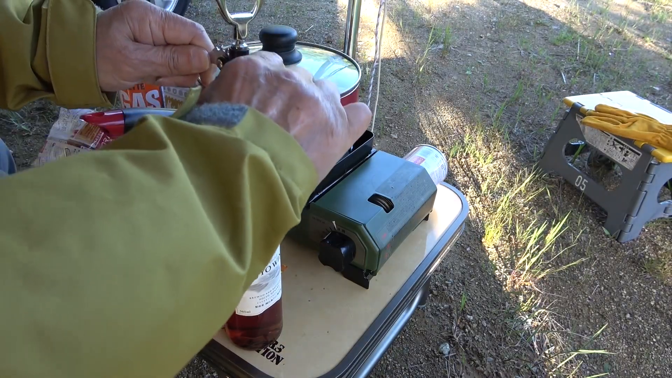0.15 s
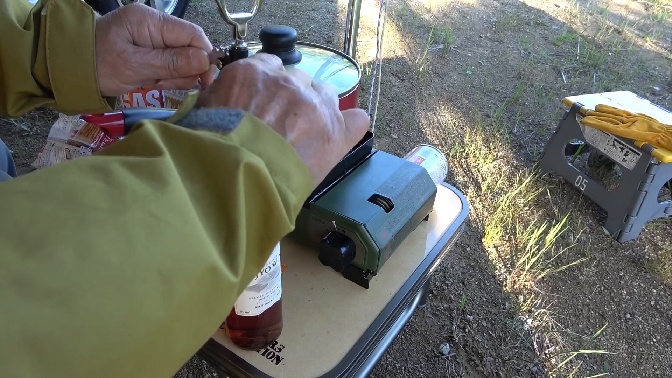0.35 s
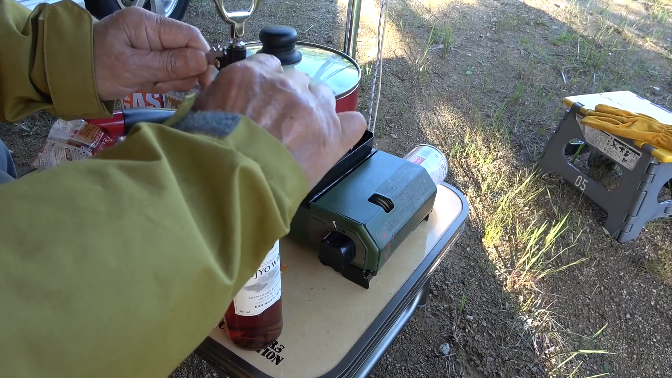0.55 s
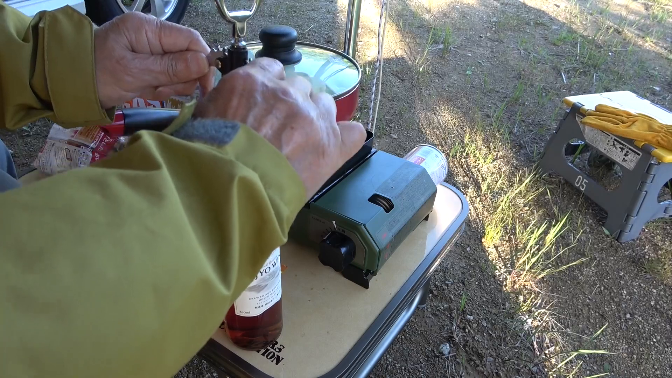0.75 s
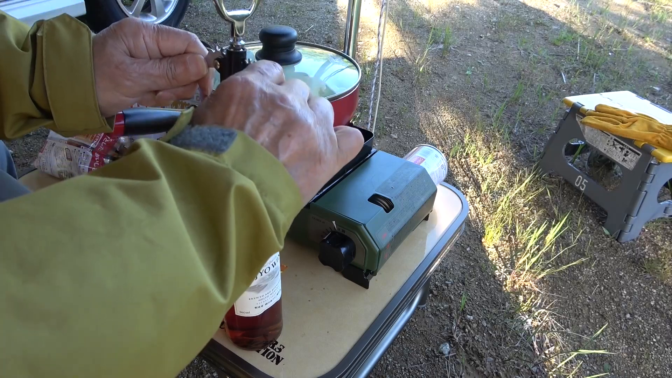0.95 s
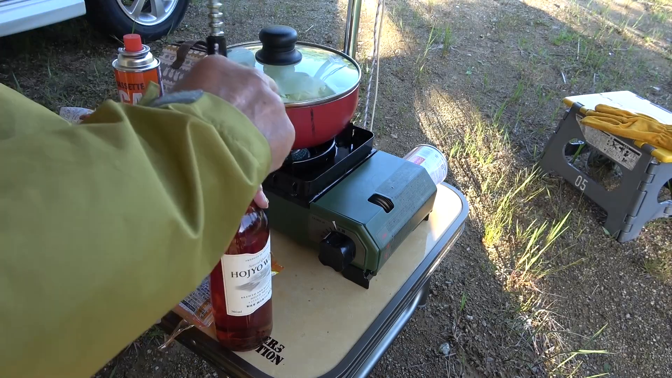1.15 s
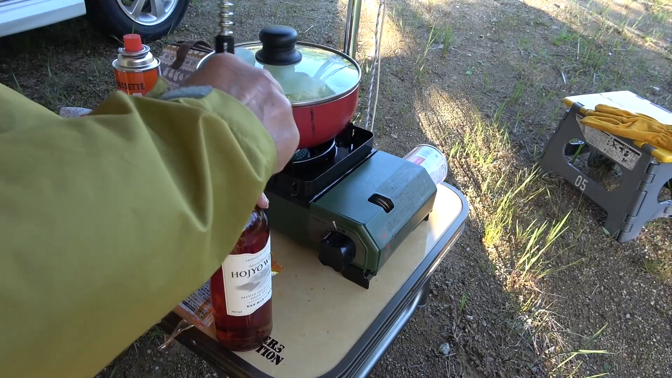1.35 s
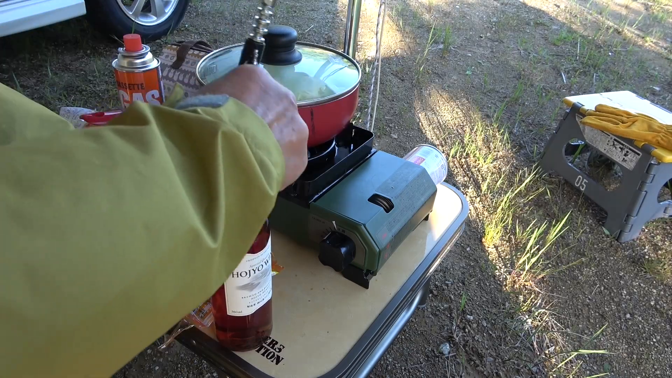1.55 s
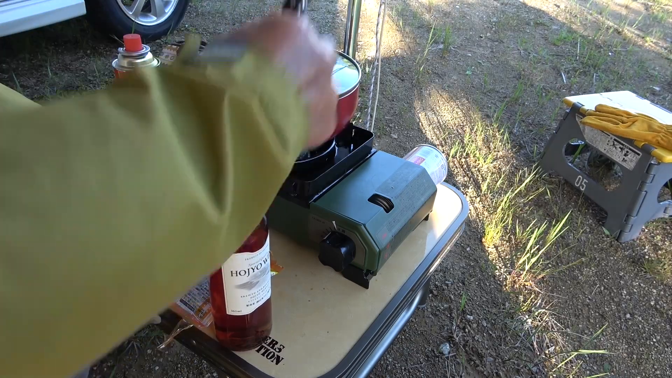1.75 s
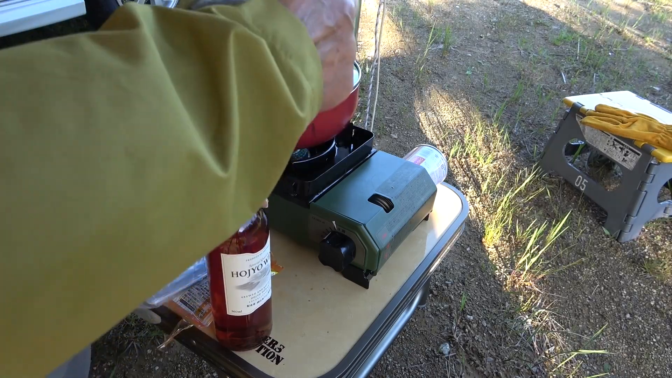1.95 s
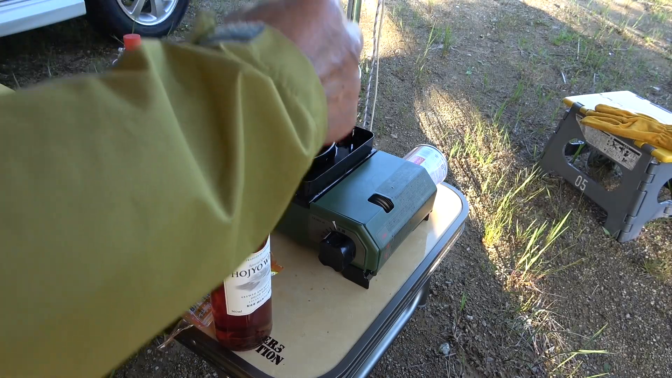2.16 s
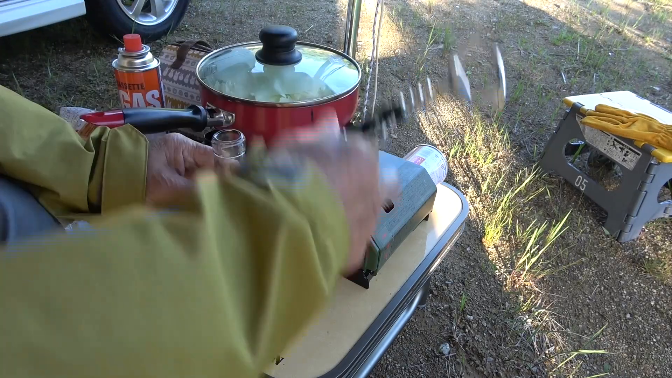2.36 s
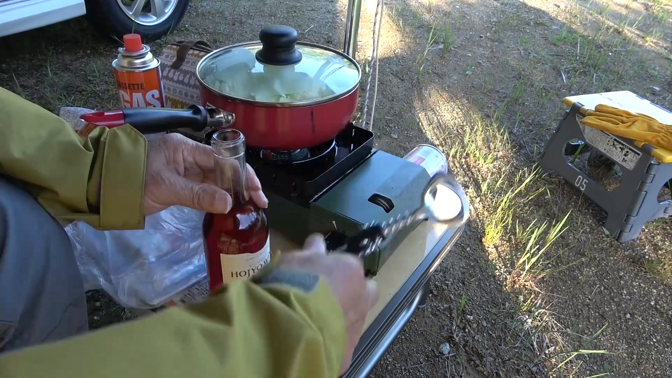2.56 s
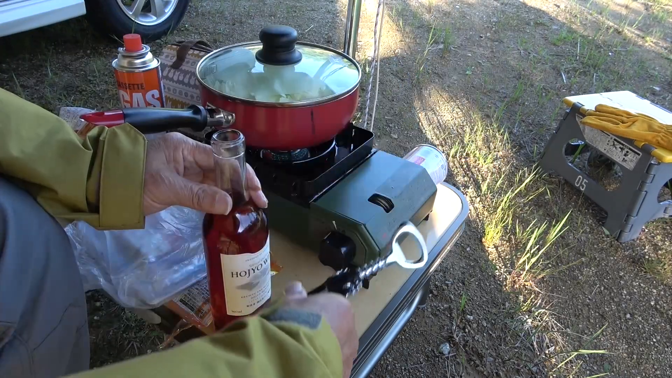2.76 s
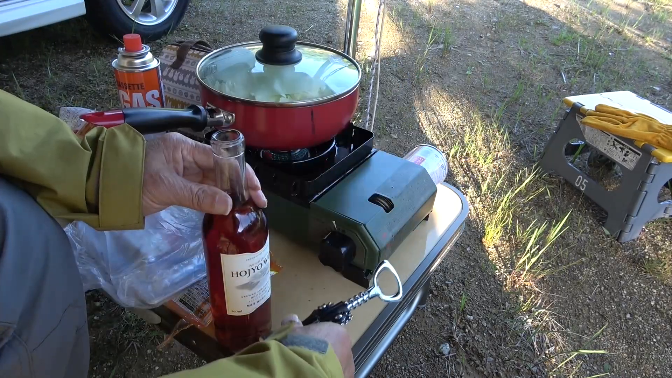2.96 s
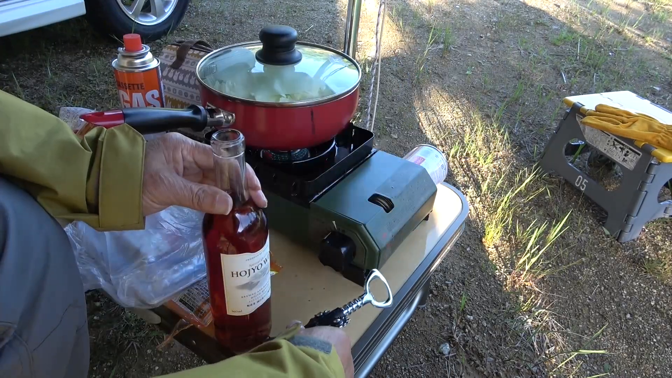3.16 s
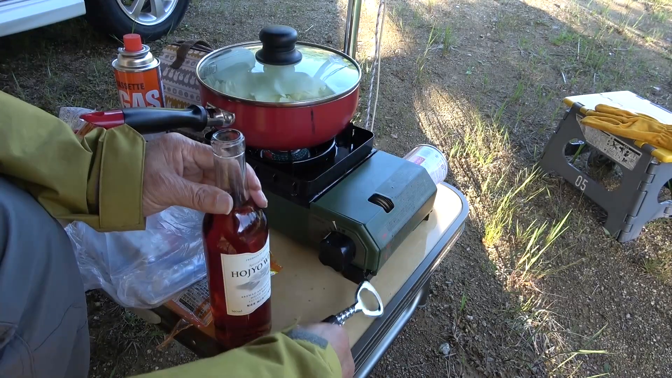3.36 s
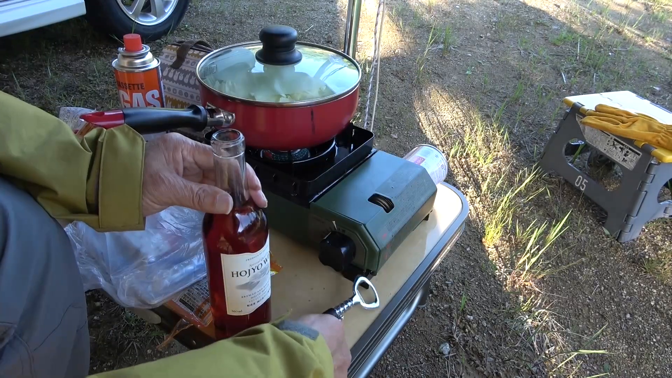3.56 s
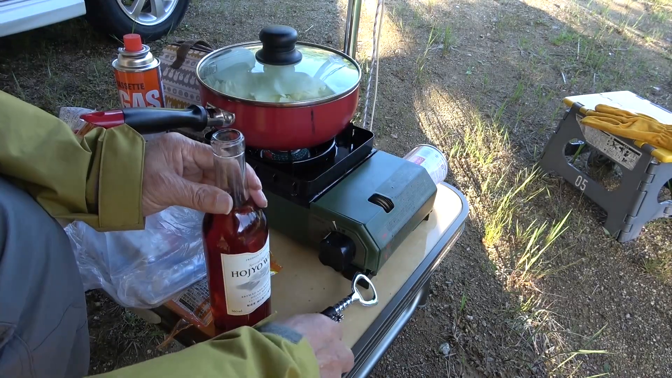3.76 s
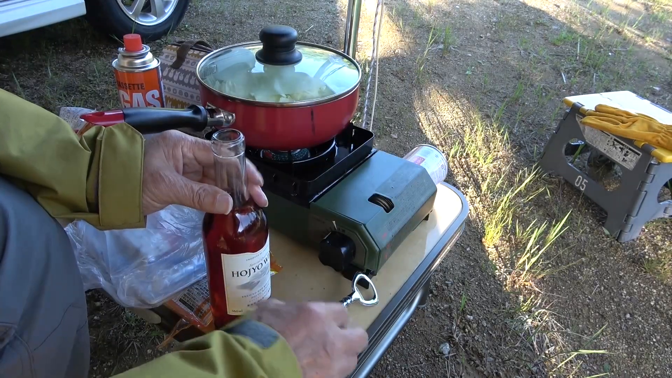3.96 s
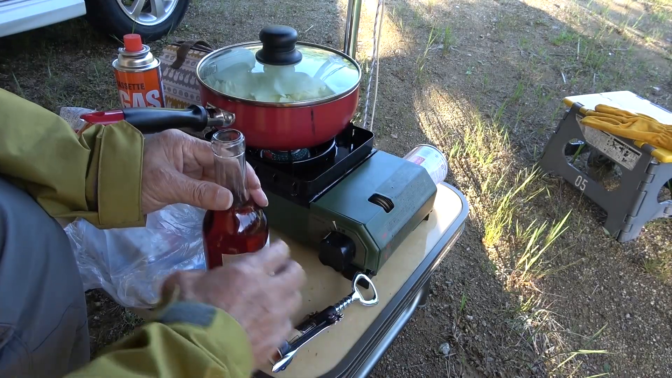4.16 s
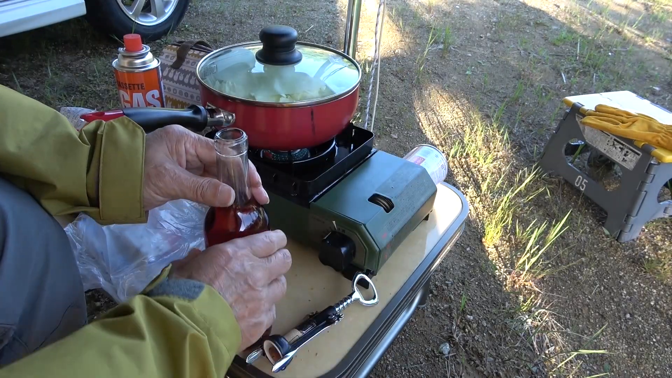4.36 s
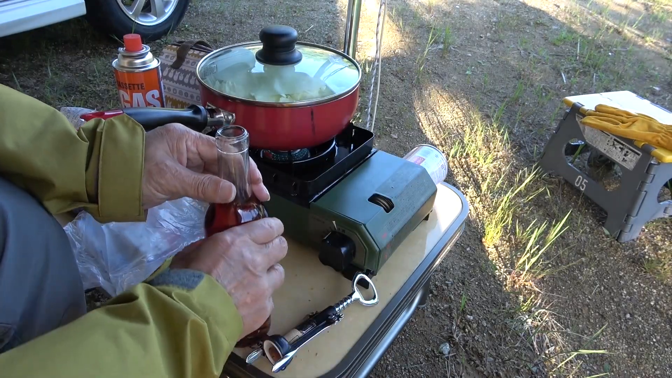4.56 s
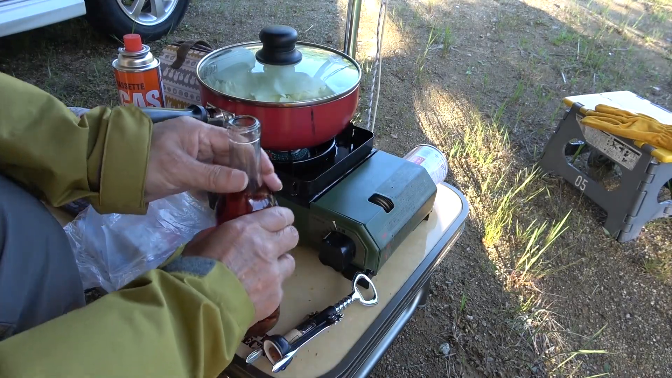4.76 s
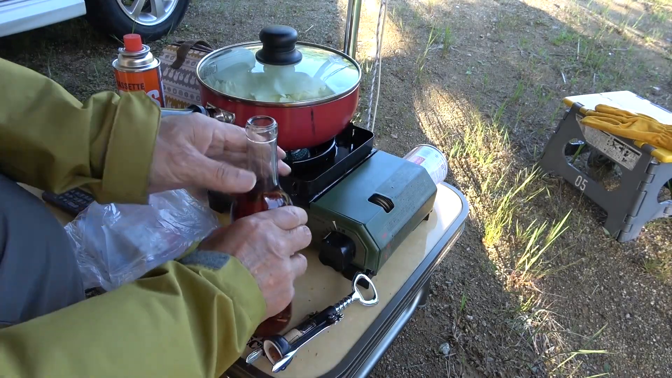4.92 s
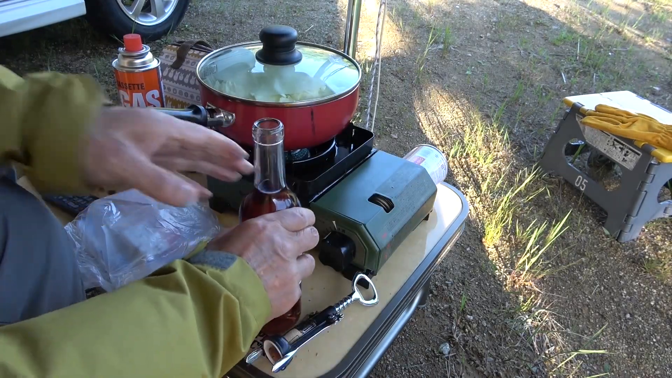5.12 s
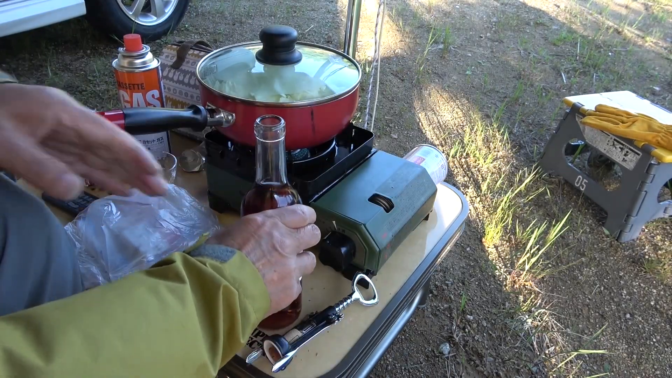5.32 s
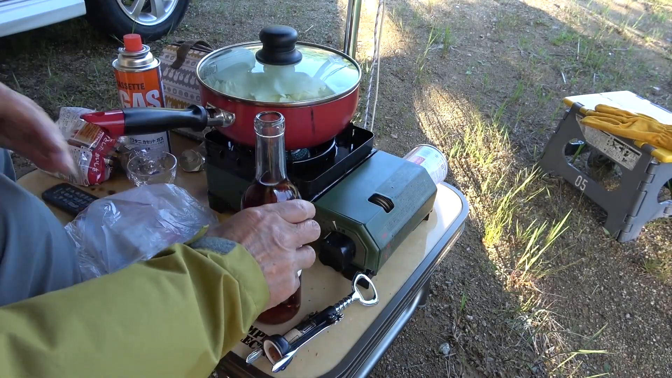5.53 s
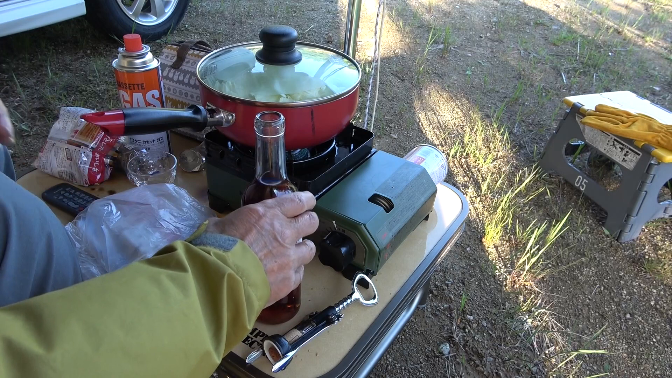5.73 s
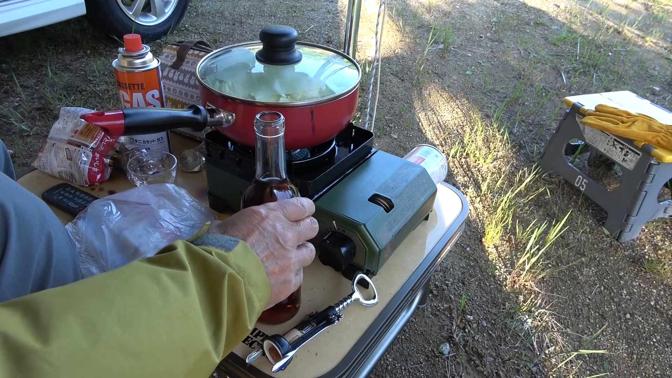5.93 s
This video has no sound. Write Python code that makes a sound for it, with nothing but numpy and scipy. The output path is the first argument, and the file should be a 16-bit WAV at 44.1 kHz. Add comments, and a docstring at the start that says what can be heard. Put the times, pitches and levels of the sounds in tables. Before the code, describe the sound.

A soft, hollow cork pop, faint birdlike chirps, loud metallic clacks on a thin tabletop, a heavy bottle knock and swishing jacket sleeves in quiet open air.

```python
"""Opening a bottle at a camp table

Outdoors, a cork squeaks out of a wine bottle and pops softly: noise slips, snaps and a ringing bottle neck.
A metal corkscrew slides and clacks on the table, and the bottle is set down: decaying tones plus noise bursts.
Sleeves swish in grainy noise. Behind lie a low rush and insects of filtered noise, and gliding sine chirps."""
import sys
import numpy as np
from scipy import signal
from scipy.fft import rfft, irfft
from scipy.io import wavfile
from scipy.ndimage import uniform_filter1d

SR = 44100
rng = np.random.default_rng(int(sys.argv[2]) if len(sys.argv) > 2 else 0)


def to_wav(s):
    """Save 16-bit WAV."""
    ch = np.atleast_2d(s).T  # columns
    pcm = np.round(np.clip(ch, -1, 1) * 32767)  # PCM
    wavfile.write(sys.argv[1], SR, pcm.astype(np.int16))


N = 268524
TIME = np.arange(N) / SR
AGE = TIME[:SR // 2]  # seconds since a hit began, up to half a second

# Tables named ..._COLOUR, and RATTLE, BOOM, BOTTLE_KNOCK and AIR, only shape the tone of noise.
# Levels in decibels are relative; fade times t60_s are the time to drop by 60 dB.

# knocks on the table top; hardness is where the treble starts to fall:
# start_s, level_db, contact_pitch_hz, hardness_hz, thump_db
BLOWS = [ (3.2604, -42.5, 1130, 4000, -11), (3.314, -29, 1045, 5500, -14), (3.4090, -9, 1142, 3400, -9),
         (3.413, -10.5, 2400, 11000, -1), (3.5488, -28, 2230, 10000, 2.5), (3.6041, -15, 2026, 4400, -0.5),
         (3.6541, -17, 1132, 2100, -0.5), (3.684, -42, 1120, 1500, 22), (3.7674, -41.5, 1160, 3000, 3),
         (3.894, -42, 1070, 3000, -2), (4.079, -54.5, 500, 1500, 18), (5.4722, -44, 1310, 4000, 7), ]
# tones of the thin table top: pitch_hz, level_db, t60_s
TABLE_MODES = [(1061, 6.5, 0.13), (1550, -18, 0.086), (1623, 0, 0.11), (1857, 5.5, 0.1), (2200, 4, 0.11),
               (2420, -3, 0.13), (2420, -5, 0.14), (2800, -3, 0.068), (2897, 1, 0.12), (3096, 2, 0.084),
               (3410, -11, 0.18), (3480, -22, 0.16), (3670, -18, 0.071), (4235, 4.5, 0.066),
               (4220, -25, 0.13), (4260, -4, 0.12), (4860, -29, 0.07), (5430, -2, 0.034), (6150, -10, 0.11),
               (7200, -17, 0.054), (7060, -14, 0.092), (7100, -26, 0.11), (7160, -25, 0.14),
               (8600, -10, 0.076), (8400, -6, 0.08), (8900, -18, 0.09)]
# slower-swelling tones of the whole table flexing on its legs: pitch_hz, level_db, t60_s
TABLE_FLEX = [(128, -12, 0.23), (191, 0.5, 0.13), (227, -4, 0.19), (264.4, 0, 0.18), (339, -11, 0.095),
              (434, -21, 0.078)]
# dense rattle of the frame and things on the table: frequency_hz, level_db
RATTLE = [(60, -38), (200, -11), (480, -10.5), (700, -19), (1050, 6.5), (1500, -1.5), (2300, 1.5),
          (3100, 0.5), (5000, -7.5), (7000, -6.5), (8300, -9), (10000, -11.5), (15000, -18)]
# boom of the hollow underside: frequency_hz, level_db
BOOM = [(50, -47), (110, -19), (170, -7), (235, 6), (320, -8), (450, -3.5), (620, -6), (1200, -41)]
# the bottle lands, then rocks flat: start_s, level_db, contact_pitch_hz
LANDINGS = [(5.011, 1, 1946), (5.1668, -15.5, 1250)]
# the heavy bottle drives the table: pitch_hz, level_db, t60_s
BOTTLE_MODES = [(150, -32.5, 0.17), (216.4, -21, 0.22), (241, -20.5, 0.24), (402, -15.5, 0.042),
                (437, -18.5, 0.11), (758, -24, 0.077), (1026, -14, 0.019)]
# dull knock of the full bottle: frequency_hz, level_db
BOTTLE_KNOCK = [(120, -22), (300, -7), (420, 6), (600, -8.5), (760, -7), (1100, -8.5), (1450, -23),
                (1950, -12), (2600, -29), (5000, -48)]
# shoves of the corkscrew over the table: peak_s, level_db, swell_s, fade_s
SLIDE = [(3.41, -44, 0.021, .06), (3.535, -36, 0.035, 0.053), (3.74, -52, .04, .04),
         (3.9, -50.5, 0.028, 0.018)]
# rubs of the cork on the glass: peak_s, level_db, swell_s, fade_s
CORK_SLIP = [(1.693, -36, 0.0081, .004), (1.72, -48.5, 0.022, 0.068), (1.885, -57.5, 0.044, .04)]
# tone of the rubbing cork: frequency_hz, level_db
CORK_COLOUR = [(710, -49), (1200, -13), (1530, -10), (2060, 0.5), (2710, -2), (3040, -10), (3840, -4),
               (4360, -9.5), (5320, -5), (6310, -5.5), (7870, -9.5), (8750, -7), (15000, -24)]
# the cork lets go in a few jerks: start_s, neck_db, snap_db
POPS = [(1.6954, -32.5, -43), (1.7134, -24.5, -25.5), (1.7337, -41, -33.5), (1.745, -33, -50)]
# tone of each snap: frequency_hz, level_db
SNAP_COLOUR = [(350, -27), (600, 2), (754, -9), (988, 2), (1240, -12), (1380, -7), (2790, -5.5),
               (3550, -19), (6250, -23), (15000, -35)]
# air in and around the bottle neck: pitch_hz, level_db, t60_s
NECK_MODES = [(108.7, -14.5, 0.32), (160, -15, 0.09), (214, 4, 0.068), (255, -4.5, 0.2), (401, -7, 0.11),
              (506.6, -10, 0.22), (977, -12, 0.071)]
# faint singing of the bottle glass: pitch_hz, level_db, t60_s
GLASS = [(1550, -52, 1.0)]
# light, dry clicks of corkscrew and fingers: start_s, level_db, lowest_hz, highest_hz, t60_s
CLICKS = [(0.766, -33.5, 350, 2800, 0.011), (4.788, -25.5, 1870, 5000, 0.027),
          (5.596, -39, 2200, 5900, .025)]
# left and right tone of the things on the table: frequency_hz, left_minus_right_db
NEAR_BALANCE = [(60, -5), (110, 2.5), (200, 3.5), (380, 4), (700, 3), (1290, 2), (2380, 1), (4400, 4),
                (8120, 4.5), (15000, -1)]
# strokes of sleeve and hand: peak_s, level_db, swell_s, fade_s
SLEEVE = [(1.205, -60, .015, .012), (2.6, -55, 0.2, .65), (4.3, -56.5, 0.49, .5), (4.78, -45, 0.044, 0.19),
          (5.1, -46.5, 0.11, 0.13), (5.335, -43, 0.09, .1), (5.6, -56, .1, .08), (6.05, -55.5, .25, .3)]
# tone of the cloth: frequency_hz, level_db
SLEEVE_COLOUR = [(300, -32), (800, 1), (1700, -2), (2600, -4), (3500, -4.5), (5000, -5.5), (6200, -5),
                 (8000, -9), (11000, -14.5), (15000, -20)]
# left and right tone of the cloth: frequency_hz, left_minus_right_db
SLEEVE_BALANCE = [(60, 1.0), (110, 2.5), (200, -1), (380, 2.5), (700, 2.5), (1290, 7.5), (2380, 6),
                  (4400, 8.5), (8120, 7), (15000, -0.5)]
# faint chirps: start_s, length_s, start_hz, middle_hz, end_hz, level_db
CHIRPS = [(2.032, .05, 1820, 1780, 1560, -55.5), (2.15, .075, 2800, 2300, 1980, -57),
          (2.261, .09, 1784, 2000, 2410, -52), (2.447, 0.068, 2330, 2015, 1850, -53),
          (4.35, .14, 6000, 5850, 5800, -62)]
# insects: pitch_hz, width_hz, level_db, start_s, stop_s
INSECTS = [(8280, 220, -71, -1, 7), (9700, 220, -75, -1, 1.2), (2850, 68, -72.5, -1, 1.06),
           (11660, 370, -73.5, 1.27, 4.37), (12660, 250, -76, .9, 4.7)]
# tone of the outdoor rush: frequency_hz, level_db
AIR = [(15, -38), (25, -8), (99, -7.5), (140, -2.5), (215, -5.5), (349, -0.5), (378, -5), (469, -4),
       (684, -14), (1750, -23.5), (1900, -27), (2850, -23.5), (3720, -30), (8350, -31), (15500, -39.5)]
# how wide the rush is, before a shared cut of the side part: frequency_hz, side_minus_mid_db
AIR_SIDE = [(60, -8), (110, -14), (200, -19), (380, -11.5), (700, -3), (1290, -16), (2380, -16), (4400, -6),
            (8120, 7.5), (15000, -11)]
# left and right tone of the middle of the rush: frequency_hz, left_minus_right_db
AIR_BALANCE = [(60, 1.5), (110, 0), (200, 7), (380, 2.5), (700, 1.5), (1290, 3.5), (2380, 1), (4400, 3.5),
               (8120, 0.5), (15000, -0.5)]

# every knock shares the rattle's fade and the gain of its crack
RATTLE_T60_S, CRACK_DB = 0.11, 3
# a soft contact gives a pitched clack; each octave of hardness takes some of it away
CLACK_DB, CLACK_AT_HZ, CLACK_DB_PER_OCTAVE = 16, 2500, -4
# how the bottle's base strikes the table top
BASE_DB, BASE_CLACK_DB, BASE_THUMP_DB, BASE_HARD_HZ = -20, 13, 4, 1200
NECK_LAG_S = 0.00199  # the air in the neck answers just after each snap
# the ribbed weave sings around this pitch
SWISH_HZ, SWISH_WIDTH_HZ = 2500, 870
SWISH_FULL_DB, SWISH_SLOPE = -42.5, 1.74
AIR_DB = -47
# a deep rumble holds, then dies away
RUMBLE_DB, RUMBLE_END_S, RUMBLE_T60_S = -59.5, 1.1, 0.6
TOP_HZ = 15700  # the microphone passes nothing much above this


def undb(db):
    """Turn decibels into a gain."""
    return 10 ** (np.asarray(db) / 20)


def unit(x):
    """Scale a sound to an average strength (rms) of 1."""
    return x / np.sqrt(np.mean(x ** 2))


def freqs(x):
    """Frequency of each spectral bin of x, in Hz."""
    return np.maximum(np.fft.rfftfreq(len(x), 1 / SR), 1)


def colour(x, points, power=1):
    """Shape the tone of x with a table of frequency_hz and level_db."""
    hz, db = np.transpose(points)
    level_db = np.interp(np.log(freqs(x)), np.log(hz), db)
    return irfft(rfft(x) * undb(power * level_db), len(x))


def band(hz, width_hz):
    """Noise in a narrow band around one pitch, rms 1."""
    noise = rng.standard_normal(N)
    distance = 2 * (freqs(noise) - hz) / width_hz
    return unit(irfft(rfft(noise) / (1 + distance ** 4), N))


def walk(rate):
    """Smooth random wander with about `rate` new values a second."""
    hold = int(SR / rate)
    steps = np.repeat(rng.standard_normal(N // hold + 1), hold)
    return 1.04 * uniform_filter1d(steps, hold)[:N]


def grains(rate, spread_db):
    """Tiny slips of uneven size at random moments, `rate` a second on average."""
    happens = rng.random(N) < rate / SR
    size = rng.standard_normal(N)
    return happens * size * undb(spread_db * rng.standard_normal(N))


def fade(t60, rise):
    """Gain of one hit: it swells at a pace set by `rise` seconds and dies away."""
    return (1 - np.exp(-AGE / rise)) * np.exp(-np.log(1000) * AGE / t60)


def ring(modes, rise, scatter_db=0, scatter_phase=0, detune=0):
    """Sum of fading tones; size, phase and pitch can vary at random from blow to blow."""
    chance = rng.standard_normal((len(modes), 3))
    out = np.zeros(len(AGE))
    for (hz, db, t60), (size, phase, pitch) in zip(modes, chance):
        angle = 2 * np.pi * hz * (1 + detune * pitch) * AGE + scatter_phase * phase
        out += undb(db + scatter_db * size) * fade(t60, rise) * np.sin(angle)
    return out


def burst(points):
    """Noise of the given tone, as long as one hit, rms 1."""
    return unit(colour(rng.standard_normal(len(AGE)), points))


def swells(rows):
    """Gain of rubbing strokes: each gathers, peaks and slows in a bell shape; their powers add."""
    power = np.zeros(N)
    for peak_s, db, swell_s, fade_s in rows:
        width_s = np.where(TIME < peak_s, swell_s, fade_s)
        power += undb(db) ** 2 * np.exp(-((TIME - peak_s) / width_s) ** 2)
    return np.sqrt(power)


def add(track, s, sound):
    """Mix a sound into the track at s seconds."""
    i = int(s * SR)
    track[i:i + len(sound)] += sound[:N - i]


def place(x, balance):
    """Make left and right channels, each taking half of the balance in dB."""
    return np.array([colour(x, balance, .5), colour(x, balance, -.5)])


def table():
    """The corkscrew, the hands and one light touch of the bottle knock; softer contacts clack more."""
    out = np.zeros(N)
    for s, db, hz, hard_hz, thump_db in BLOWS:
        clack_db = CLACK_DB + CLACK_DB_PER_OCTAVE * np.log2(hard_hz / CLACK_AT_HZ)
        add(out, s, undb(db) * knock(hz, hard_hz, clack_db, thump_db))
    return out


def knock(hz, hard_hz, clack_db, thump_db):
    """A blow cracks and clacks at the contact; the top rings, the frame rattles, the table flexes."""
    clack = fade(t60=.016, rise=0.0012) * np.sin(2 * np.pi * hz * AGE)
    top = undb(-15) * ring(TABLE_MODES, rise=0.0015, scatter_db=2.5, scatter_phase=np.pi, detune=0.0018)
    rattle = undb(-4) * burst(RATTLE) * fade(RATTLE_T60_S, rise=0.0016)
    crack = undb(CRACK_DB) * burst(RATTLE) * fade(t60=.013, rise=.0002)
    # a softer contact pushes longer and leaves the treble out
    soft = signal.butter(1, min(hard_hz, SR / 2 - 1), fs=SR)
    bright = signal.lfilter(*soft, top + rattle + crack)
    # a broad contact patch blurs the very top as well
    blur = signal.butter(1, min(6 * hard_hz, SR / 2 - 1), fs=SR)
    bright = signal.lfilter(*blur, bright)
    flex = undb(-10.5) * ring(TABLE_FLEX, rise=0.013, scatter_db=3, scatter_phase=0.59)
    boom = undb(-13) * burst(BOOM) * fade(t60=0.2, rise=0.0089)
    return undb(clack_db) * clack + bright + undb(thump_db) * (flex + boom)


def bottle():
    """The full bottle strikes the table top; its weight adds a dull thud and a low ring."""
    out = np.zeros(N)
    for s, db, hz in LANDINGS:
        base = undb(BASE_DB) * knock(hz, BASE_HARD_HZ, BASE_CLACK_DB, BASE_THUMP_DB)
        thud = undb(-14.5) * burst(BOTTLE_KNOCK) * fade(t60=0.08, rise=0.0066)
        low_ring = ring(BOTTLE_MODES, rise=0.0025)
        add(out, s, undb(db) * (base + thud + low_ring))
    return out


def cork():
    """The cork squeaks in fast slips and snaps free; the air in the neck rings and the glass sings."""
    squeak = unit(colour(grains(rate=12000, spread_db=1.5), CORK_COLOUR))
    out = swells(CORK_SLIP) * squeak
    for s, neck_db, snap_db in POPS:
        # each snap has a sharp start and a weaker tail
        snap_gain = fade(t60=0.014, rise=.0003) + undb(-13) * fade(t60=0.16, rise=0.0045)
        snap = burst(SNAP_COLOUR) * snap_gain
        tick = undb(-3) * burst(CORK_COLOUR) * fade(t60=0.0078, rise=.0003)
        boom = undb(-10) * burst(BOOM) * fade(t60=0.31, rise=0.0035)
        neck = ring(NECK_MODES, rise=0.0011)
        add(out, s, undb(snap_db) * (snap + tick))
        add(out, s + NECK_LAG_S, undb(neck_db) * (neck + boom))
    add(out, POPS[1][0], ring(GLASS, rise=.002))  # the glass starts with the second jerk
    return out


def slide():
    """Metal catches on the table top in tiny slips: a rough rasp over a drone of the top."""
    slips = grains(rate=2500, spread_db=3)
    rasp_colour = [(600, -17), (1100, 1), (1500, -1), (2500, 5.0),
                   (3200, -4), (4200, -14), (9000, -23), (15000, -34)]  # frequency_hz, level_db
    rasp = undb(-4) * unit(colour(slips, rasp_colour))
    drone = undb(-1) * band(1120, 310)
    return swells(SLIDE) * (rasp + drone)


def clicks():
    """Small hand-held contacts, too light to set the table ringing: short bursts of filtered noise."""
    out = np.zeros(N)
    for s, db, low_hz, high_hz, t60 in CLICKS:
        snap = rng.standard_normal(len(AGE)) * fade(t60, rise=.0001)
        body = signal.butter(2, [low_hz, high_hz], "band", fs=SR, output="sos")
        add(out, s, undb(db + 5) * signal.sosfilt(body, snap))
    return out


def sleeves():
    """Jacket cloth slides over itself: a fine, uneven hiss, and on strong strokes the weave sings."""
    stroke = swells(SLEEVE)
    fibres = grains(rate=12000, spread_db=1.5)
    hiss = unit(colour(fibres, SLEEVE_COLOUR))
    swish_gain = (stroke / undb(SWISH_FULL_DB)) ** SWISH_SLOPE
    swish = swish_gain * band(SWISH_HZ, SWISH_WIDTH_HZ)
    unevenness = undb(.9 * walk(25))
    return (hiss + swish) * stroke * unevenness


def chirps():
    """Thin, rough whistles that glide through three pitches, blurred by scattered echoes."""
    out = np.zeros(N)
    for s, length, start_hz, middle_hz, end_hz, db in CHIRPS:
        progress = np.linspace(0, 1, int(length * SR))
        glide_hz = np.interp(progress, [0, .5, 1], [start_hz, middle_hz, end_hz])
        hz = glide_hz * (1 + 0.0345 * walk(500)[:len(progress)])  # the pitch roughens at random
        whistle = np.sin(2 * np.pi * np.cumsum(hz) / SR)
        add(out, s, undb(db) * np.sin(np.pi * progress) * whistle)
    echoes = rng.standard_normal(len(AGE)) * fade(t60=0.53, rise=0.0092)
    echoes = echoes / np.sqrt(np.sum(echoes ** 2))
    return out + undb(-2) * signal.fftconvolve(out, echoes)[:N]


def insects():
    """Narrow shrill bands of noise that start and stop, with a slight flutter."""
    out = np.zeros(N)
    for hz, width_hz, db, start, stop in INSECTS:
        flutter_db = walk(14)
        singing = np.clip(np.minimum(TIME - start, stop - TIME) / .2, 0, 1)
        out += undb(db + flutter_db) * singing * band(hz, width_hz)
    return out


def rush():
    """One layer of outdoor rush: coloured noise whose level wanders slowly."""
    noise = unit(colour(rng.standard_normal(N), AIR))
    return noise * undb(AIR_DB + .5 * walk(4.99))


def air():
    """A low, even outdoor rush with a hollow hump and a dying rumble, nearly alike on both sides."""
    mid, side = rush(), rush()
    hump = undb(-54.5 + walk(14)) * band(334, 210)
    dying = np.exp(-np.log(1000) * np.maximum(TIME - RUMBLE_END_S, 0) / RUMBLE_T60_S)
    rumble = undb(RUMBLE_DB) * dying * band(34, 9)
    # the side part has opposite signs left and right, which widens the rush
    width = undb(-8) * colour(side, AIR_SIDE) * np.array([[1], [-1]])
    return place(mid, AIR_BALANCE) + hump + rumble + width


def scene():
    """Things on the table stand just left of centre; the sleeves are further left."""
    near = place(table() + bottle() + slide() + cork() + clicks(), NEAR_BALANCE)
    cloth = place(sleeves(), SLEEVE_BALANCE)
    # a second, weaker draw of the insects widens them
    insect_width = undb(-17) * insects() * np.array([[1], [-1]])
    far = chirps() + insects() + insect_width
    return near + cloth + far + air()


def record(dry):
    """The microphone thins the deepest bass, rounds peaks near full scale and cuts the top."""
    thinned = signal.sosfilt(signal.butter(4, 33, "high", fs=SR, output="sos"), dry)
    rounded = thinned / (1 + thinned ** 6) ** (1 / 6)
    return signal.sosfilt(signal.ellip(10, .2, 80, TOP_HZ, fs=SR, output="sos"), rounded)


dry = scene()
out = record(dry)
to_wav(out)
```